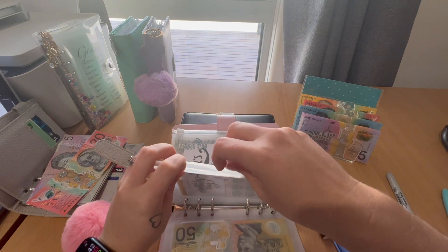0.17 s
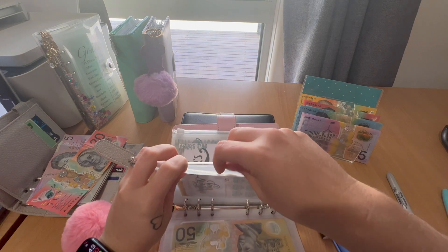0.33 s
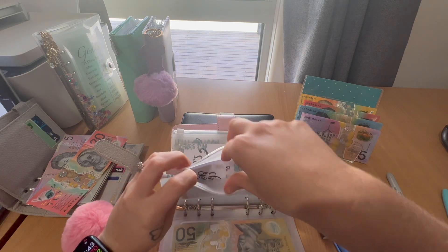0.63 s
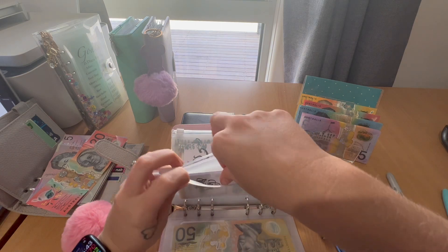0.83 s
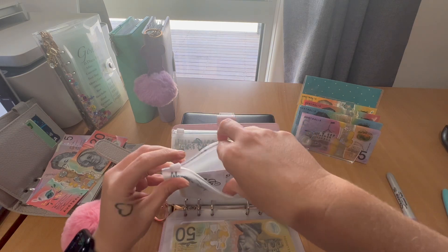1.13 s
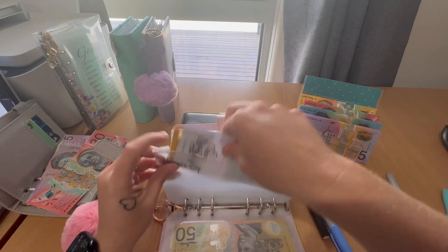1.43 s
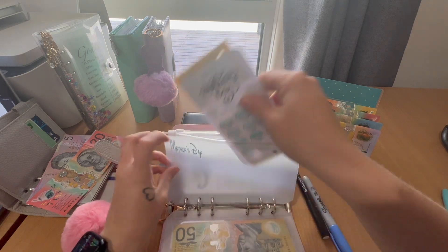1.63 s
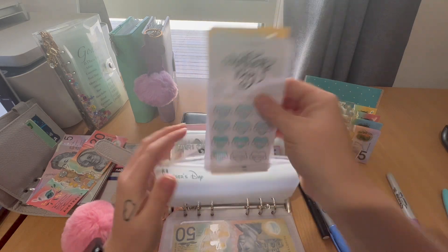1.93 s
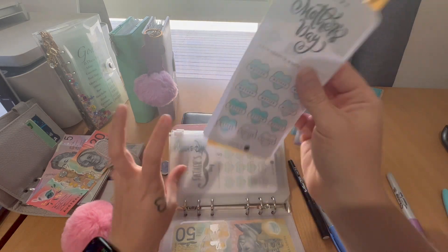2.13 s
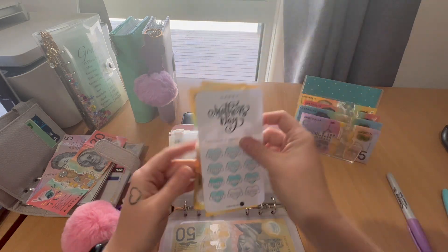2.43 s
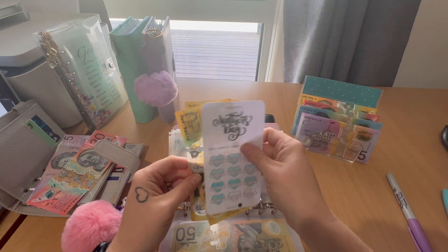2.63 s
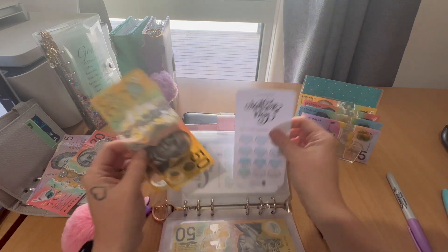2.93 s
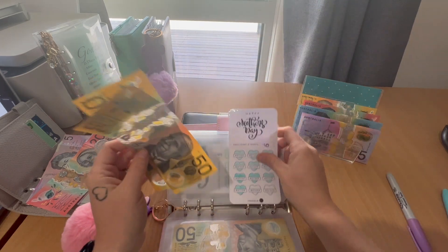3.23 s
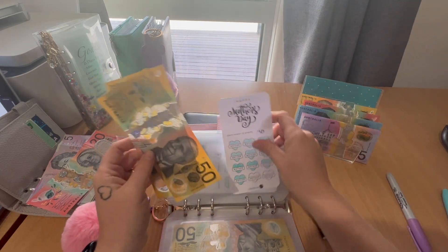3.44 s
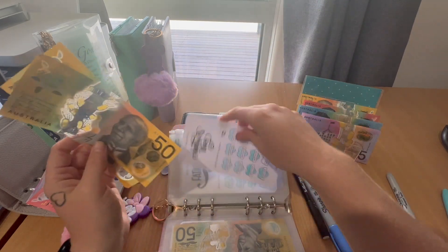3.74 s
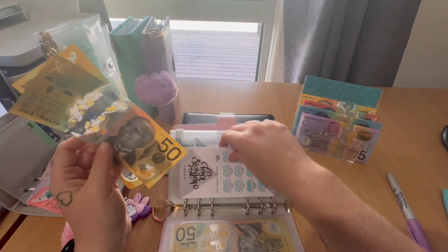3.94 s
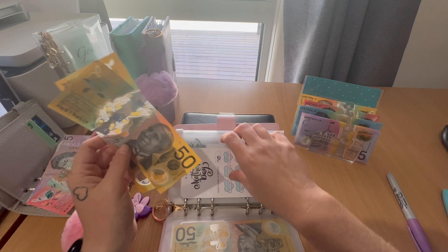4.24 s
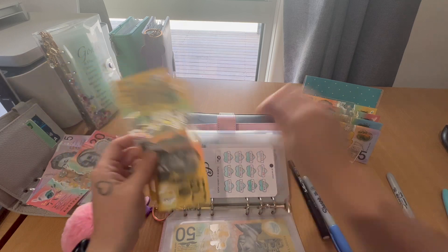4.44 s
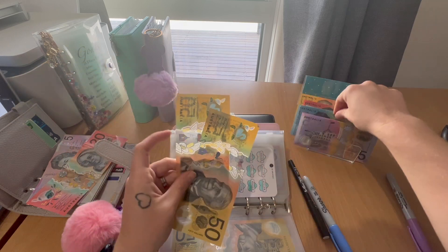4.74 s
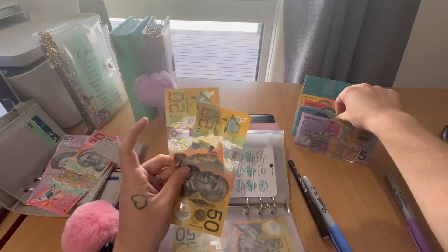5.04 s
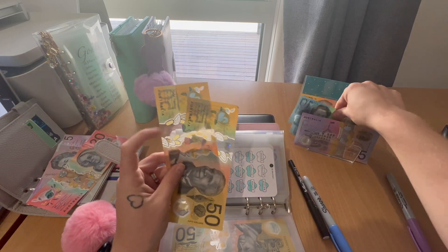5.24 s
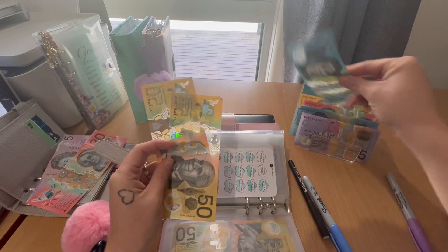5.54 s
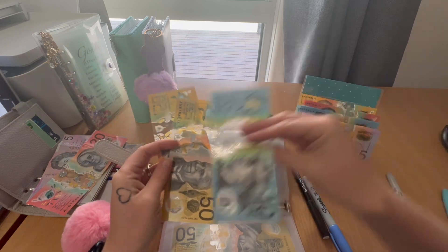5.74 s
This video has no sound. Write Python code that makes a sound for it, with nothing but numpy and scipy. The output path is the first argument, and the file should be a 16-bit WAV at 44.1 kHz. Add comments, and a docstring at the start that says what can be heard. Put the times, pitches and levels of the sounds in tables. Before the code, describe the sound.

A quiet room with soft air noise, a low fan-like hum and a barely audible thin whine, heard by close stereo microphones. Hands work at a plastic pocket: faint rustles and ticks from 0 s, a cluster of clicks and a pop around 0.6 s, then a very loud, dry snap at 1.0 s. A long, hissing slide runs from 1.3 to 1.75 s, with another hard snap, hollow pop and low bump at 1.55 s. Bright film rustles follow around 1.8-2.1 s, then notes part with rubbing at 2.7-3 s, a strong pop at 3.0 s and another at 3.5 s. Around 3.8-3.9 s the card slips in with a short squeak and click. After 4.2 s handling is sparse and light, with small flicks at 5.4 and 5.6 s. Faint high chirps, about every 0.44 s, begin at 2.4 s; the hum swells briefly near 4.5 s.

```python
"""Hands open a clear plastic binder pocket on a desk, draw out a card and polymer banknotes, part them,
slide the card back and fetch another note. Films hiss as dense tiny slips, snap at their edges and pop as
they buckle, each flick ringing damped modes. Faint chirps from further off join in before the middle.
Behind it all lie room air, a low fan-like hum and a thin whine; two close microphone ports hear it."""
import sys
import numpy as np
from scipy import signal
from scipy.fft import rfft, irfft, next_fast_len
from scipy.io import wavfile
from scipy.ndimage import map_coordinates

SR = 44100
rng = np.random.default_rng(int(sys.argv[2]) if len(sys.argv) > 2 else 0)


def master(y):
    """Save y as 16-bit WAV."""
    cut = np.clip(np.atleast_2d(y).T, -1, 1)
    pcm = np.round(cut * 32767)  # scale
    wavfile.write(sys.argv[1], SR, pcm.astype(np.int16))


N = 258867
TIME = np.arange(N) / SR

# Long pull of card and notes out of the pocket, before the grip gain.
# Each row: time in seconds, friction hiss in dB, rasp in dB, edge sizzle in dB.
PULL = [(1.27, -58, -52.5, -85), (1.315, -37, -52.5, -41), (1.35, -43, -44.5, -47),
        (1.42, -43.5, -44.5, -42.5), (1.53, -36, -49.5, -42.5), (1.59, -48, -47.5, -56),
        (1.66, -51, -51.5, -59), (1.72, -48.5, -48, -69), (1.79, -62, -66, -78)]
# Short strokes of film on film, before the grip gain. Each row: start in seconds, attack in seconds,
# hold in seconds, friction hiss in dB, rasp against the hiss in dB, edge sizzle against the hiss in dB.
STROKES = [(0.016, 0.022, 0.02, -62.5, 11, -9), (0.155, 0.015, 0.0063, -57.5, 9, -9),
           (0.238, 0.0091, 0.052, -59.5, 4, -21), (0.414, 0.012, 0.009, -75, 0, -12),
           (0.51, 0.025, 0.043, -52.5, 4.5, -16), (0.617, 0.12, 0.01, -50.5, 7, -15),
           (0.924, 0.012, 0.12, -48.5, 0, -16), (1.096, 0.091, 0.046, -50, 4, -10),
           (1.777, 0.077, 0.023, -41, -6.5, -3.5), (1.91, 0.02, 0.02, -45.5, -5, -4.5),
           (1.997, 0.019, 0.063, -54, -7, -19), (2.125, 0.0067, 0.0084, -48.5, 8, 1),
           (2.395, 0.12, 0.038, -55, -6, -12), (2.646, 0.024, 0.011, -59.5, 6, 3),
           (2.721, 0.084, 0.028, -41.5, -1.5, -3), (2.929, 0.012, 0.051, -43.5, -25, -4.5),
           (3.254, 0.02, 0.046, -51, -1, -31), (3.35, 0.095, 0.093, -57, 5, -27),
           (3.62, 0.047, 0.022, -52.5, 4, -8), (3.789, 0.0072, 0.08, -55.5, -4, 9.5),
           (3.847, 0.018, 0.018, -44.5, 1, -8), (3.88, 0.008, 0.03, -51.5, 9, -16),
           (4.064, 0.011, 0.0069, -56, -5, -10), (4.138, 0.025, 0.017, -50.5, -13, -12),
           (4.395, 0.042, 0.041, -55, -13.5, -12), (4.616, .012, 0.063, -61, -10, -8.5),
           (4.991, 0.014, 0.016, -60.5, 5, -8), (5.056, 0.015, 0.08, -58.5, -7, -11),
           (5.19, 0.025, 0.015, -60, 4, -9), (5.304, 0.032, 0.12, -62.5, 0, 2),
           (5.44, 0.11, 0.14, -59.5, -18, -13), (5.598, 0.032, 0.069, -57, -10, -0.5),
           (5.835, 0.0091, 0.014, -58.5, -11, 3.5)]
STROKE_RELEASE_DB_PER_S, SIZZLE_RELEASE_DB_PER_S = 282, 400   # the fine sizzle stops first
# The held sheets are never quite still, least of all once the notes are out; before the grip gain.
# Each row: time in seconds, friction hiss in dB, rasp in dB, edge sizzle in dB.
RESTING = [(0, -94, -58, -99), (2.3, -94, -63, -84), (4.9, -81, -63.5, -79), (5.87, -65, -61, -72)]
# Colours of the rubbing, as relative spectra. Each row: frequency in Hz, density in dB per Hz.
RASP = [(400, -8), (900, 0.5), (1250, 12), (1650, 16), (2200, 7.5), (3300, -33)]
HISS = [(1800, -9), (2700, 0.5), (3800, -2.5), (4600, -2.5), (5600, -2.5), (7000, -7), (8500, -8),
        (11000, -50)]
SIZZLE = [(6500, 5.5), (9000, -1), (12000, 4), (16000, -3)]
# The card edge singing against the pocket, before the grip gain. Each row: time in seconds, level in dB.
SQUEAK = [(3.78, -71), (3.81, -44), (3.85, -44), (3.872, -60), (3.9, -88)]
SQUEAK_HZ, SQUEAK_WIDTH_HZ = 5520, 580
# A card edge scraping. Each row: start in seconds, hold in seconds, level in dB, resonance in Hz.
SCRAPES = [(0.027, 0.036, -53.5, 2940), (0.728, 0.018, -39, 2800), (1.4, 0.065, -40, 2500),
           (1.918, 0.018, -40.5, 3020), (2.002, 0.0079, -43, 2700), (3.648, 0.036, -45, 2900),
           (5.64, 0.012, -52, 3070)]
SCRAPE_ATTACK_S, SCRAPE_RELEASE_DB_PER_S, SCRAPE_WIDTH_HZ = 0.0057, 400, 840

# Edges snapping free. Each row: time in seconds, level in dB, own ring in Hz, its t60 in seconds,
# brightness in dB per octave, crackle against the main release in dB.
SNAPS = [(0.0413, -60, 5070, .006, 19, 5), (0.2783, -32.5, 4770, 0.0081, -3.5, 3.5),
         (0.3055, -41, 6000, .004, 4, -1), (0.5625, -38, 4900, .005, -9, 2),
         (0.5985, -39, 4000, .005, -11, -8), (0.6258, -29, 5600, 0.0028, -1.5, 8),
         (0.9832, -24, 6000, 0.0044, -5.5, 9), (0.9853, -4, 2810, 0.0072, -3.5, -31),
         (0.9859, -9, 3700, 0.003, -1.5, -17), (0.9868, -20.5, 5600, 0.0078, 1, -5),
         (0.9915, -37, 3300, .004, -1, 1), (0.9937, -20, 6500, 0.008, -0.5, -8),
         (1.2045, -33.5, 4150, .005, -6, 3), (1.2674, -38.5, 3900, .005, 5, 6),
         (1.274, -26, 3830, .012, -3.5, 1.5), (1.5412, -25, 5360, 0.0045, -3, 19.5),
         (1.5465, -9, 3170, 0.0076, 0.5, -9), (1.5494, -6, 2255, 0.0073, -2.5, 2.5),
         (1.5508, -2.5, 5400, 0.0052, 1, -23), (1.6805, -33, 3000, .005, -6, -2),
         (1.7065, -32.5, 3200, 0.0054, -3, -8), (1.722, -41, 6300, 0.0074, 6, 7),
         (1.8267, -27.5, 8100, 0.0083, 16, 5.5), (2.1309, -21.5, 3300, 0.0074, 1, -3),
         (2.1445, -33, 4420, .006, 9, -4), (2.9365, -37, 7000, .004, 13, 7),
         (3.1038, -32, 2540, .006, -8.5, 9.5), (3.1343, -30.5, 3140, 0.008, -5.5, -12),
         (3.2735, -36.5, 6750, 0.024, -5.5, 3), (3.3175, -40.5, 6160, 0.0046, -4.5, 4),
         (3.4255, -57, 7000, .004, 2.5, -2), (3.4974, -39, 5900, 0.0055, -2, 4),
         (3.533, -33.5, 3840, 0.0035, -3.5, 3.5), (3.7938, -30, 5600, 0.011, -1.5, -11),
         (3.8786, -23.5, 3260, 0.014, -6, -12), (4.0725, -41.5, 4760, .005, -5, 5.5),
         (4.1808, -47, 5200, .005, 3, -3), (4.7521, -45.5, 4500, 0.0045, -4, 12.5),
         (4.8229, -41.5, 4000, .008, -4.5, 8), (4.946, -45, 5600, .004, -3, 3),
         (5.419, -27.5, 6350, 0.0022, 3, -1), (5.6177, -28, 4630, 0.0044, 2.5, -5),
         (5.6625, -37, 3980, .005, 0, 5)]
# Sheets buckling with a dull pop. Each row: time in seconds, level in dB, own ring in Hz,
# its t60 in seconds, brightness in dB per octave, crackle against the main release in dB.
POPS = [(0.6262, -23.5, 1470, 0.012, 7, 3), (0.6294, -20.5, 1790, 0.011, 9, -19),
        (0.9355, -31.5, 1400, 0.012, 4, 9), (0.9475, -33.5, 1620, .009, 0.5, -2),
        (1.5497, -17.5, 1760, 0.0035, 7, -5), (1.6803, -35, 1550, 0.009, 2, -10),
        (1.706, -26.5, 1630, 0.0073, 6.5, -18), (2.0405, -35, 940, 0.02, 0, -15),
        (2.0647, -37, 1790, 0.013, 10, 16), (2.0872, -32, 1700, 0.0042, 4.5, -11),
        (2.5207, -33, 1420, 0.019, -2, 8), (3.001, -25.5, 2330, 0.0045, -5, 3),
        (3.009, -12, 1640, .0045, -1, -7), (3.1045, -36.5, 1670, 0.0088, 3, 1),
        (3.1341, -22, 1530, 0.003, 1, 3.5), (3.2745, -34, 1700, 0.0041, 6, 5),
        (3.3172, -31, 1180, 0.0059, -4, 5), (3.5329, -16, 1550, 0.0089, 1.5, -3),
        (3.5355, -26, 1560, 0.0061, 3, -5), (3.8776, -23, 1680, 0.011, 7, -17),
        (3.9025, -36, 1730, .008, 7, -1), (3.9115, -36, 1750, 0.0056, -6, 1),
        (4.0706, -37.5, 1920, 0.021, 6, 2), (4.1639, -36.5, 1810, 0.017, 7, 11),
        (5.6175, -28.5, 1400, 0.0055, -4, 10.5), (5.6618, -27.5, 2480, 0.005, -2.5, -3),
        (5.6705, -44, 2300, 0.0073, -5, -3)]
# Modes of a snapping film, before brightness and bend. Each row: frequency in Hz, level in dB, t60 in seconds.
FILM = [(384, -33, 0.078), (954, -8, 0.01), (1590, -10.5, 0.0053), (2310, 2.5, 0.0034), (3540, 12, 0.00089),
        (4990, 9.5, 0.0012), (6500, -1.5, 0.0033), (8370, -4, 0.004), (12500, -9, 0.0048),
        (15000, -11.5, 0.0014)]
# Modes of a buckling sheet, before brightness. Each row: frequency in Hz, level in dB, t60 in seconds.
SHEET = [(440, -9, 0.007), (740, -24.5, 0.014), (1140, -8.5, 0.011), (1400, -3.5, 0.0077),
         (2190, 1.5, 0.0011), (2760, -3.5, 0.003)]
# What the contact passes on; a free edge is hard, a buckle is soft. Each row: frequency in Hz, gain in dB.
HARD_CONTACT = [(100, -5), (5000, 3), (10000, 0.5), (16000, -3.5)]
SOFT_CONTACT = [(100, -22.5), (250, -3), (480, 4.5), (1600, 4.5), (2400, 5), (3600, -0.5), (7000, 9.5),
                (11000, -15), (16000, -0.5)]
# own ring at a flick level of 0 dB (dB), and its further change with flick level (dB per dB)
SNAP_RING_DB, POP_RING_DB, RING_GROWTH = 4, 11, 0.24
# a film is bent differently at every flick, which detunes its short waves
BEND_OCTAVES, BEND_FROM_HZ = .12, 6000
CRACKLE_T60_S = 0.08

# The pocket bumps against the binder.
# Each row: time in seconds, frequency in Hz, level in dB, t60 in seconds.
THUDS = [(0.629, 640, -24, .03), (0.9873, 930, -11, 0.019), (1.547, 71, -39, 0.15),
         (1.549, 217, -39.5, 0.095), (1.553, 514, -27, 0.051), (1.607, 404, -29.5, 0.069)]
# Where the hands work. Each row: time in seconds, lag of the right port in milliseconds.
PLACE = [(.63, 0.2), (.98, 0.06), (1.3, .19), (2.8, 0.15), (3.0, 0.098), (3.55, 0.083), (3.8, 0.15),
         (4.8, 0.024), (5.6, 0.022)]

# Faint high chirps from further off. Each row: start in seconds, level in dB, starting pitch in Hz.
CHIRPS = [(2.43, -57, 4700), (2.866, -58, 4700), (3.306, -60, 4700), (3.744, -59, 4700),
          (4.186, -57.5, 4700), (4.623, -60, 4750), (5.056, -56, 5400), (5.505, -61, 5000)]
CHIRP_HZ, CHIRP_GLIDE_S, CHIRP_BLUR_HZ = 4570, 0.012, 130   # pitch reached, glide time constant, pitch waver
CHIRP_ATTACK_S, CHIRP_HOLD_S, CHIRP_RELEASE_DB_PER_S = 0.02, 0.016, 418
CHIRP_FLUTTER_DB, CHIRP_FLUTTER_HZ = 3, 70

# Echoes off the desk and the things on it.
# Each row: left delay in milliseconds, right delay in milliseconds, level in dB.
ECHOES = [(1.82, 2.1, -14.5), (8.4, 1.3, -25)]
ROOM_T60_S, ROOM_TREBLE_T60_S, ROOM_TREBLE_HZ = 0.45, 0.44, 9000   # the walls soak up the top a touch sooner
WALL_EDGE_HZ = 7000   # the tail softens above this
ROOM_DB, CHIRP_ROOM_DB = -13, -4
CLICK_ROOM_DB = -13.5   # a flicked sheet sends its click all round the room

# Room air, as a relative spectrum. Each row: frequency in Hz, density in dB per Hz.
AIR = [(25, -21), (45, -16.5), (105, -17.5), (190, -8.5), (330, -7), (560, -12), (920, -7.5), (1500, -16),
       (2300, -27), (3400, -37.5), (5800, -42), (8500, -44.5), (11000, -65), (16000, -67.5)]
AIR_DB, AIR_WAVER_DB, AIR_WAVER_HZ = -38.5, .5, 5
# Left-right likeness of the room air. Each row: frequency in Hz, likeness from -1 to 1.
LIKENESS = [(60, 0.92), (160, 0.28), (290, 0.065), (640, -0.25), (1400, -0.4), (3100, 0.25), (15000, -0.16)]
# Fan-like hum, before its swell. Each row: frequency in Hz, width in Hz, level in dB.
HUM = [(171.4, 39, -55), (184.5, 12, -53.5), (186, 9, -59.5), (213.2, 5.3, -57.5), (261.6, 13.5, -55)]
# The hum dips and swells once. Each row: time in seconds, gain in dB.
HUM_SWELL = [(4.2, 7.5), (4.32, 1), (4.5, 12), (4.68, 5.5), (4.9, 5)]
WHINE_HZ, WHINE_WIDTH_HZ, WHINE_DB = 6960, 280, -72.5

# Level at the right port against the left. Each row: frequency in Hz, gain in dB.
RIGHT_PORT = [(80, -2.5), (200, -3.5), (550, -2), (950, -4.5), (1500, -5.5), (2100, -3), (3500, -8),
              (6000, -12.5), (7500, -9.5), (9200, 2), (15000, -0.5)]
CUTOFF_HZ = 16250


def from_db(db):
    """Decibels to gain."""
    return 10 ** (np.asarray(db) / 20)


def rms_one(x):
    """Scale to unit rms."""
    return x / np.sqrt(np.mean(x ** 2) + 1e-20)


def in_time(rows):
    """The columns of a curve at every sample."""
    s, *columns = np.transpose(rows)
    return [np.interp(TIME, s, column) for column in columns]


def at_hz(points, hz):
    """Read a spectrum on a log-frequency axis."""
    f, value = np.transpose(points)
    return np.interp(np.log(hz), np.log(f), value)


def filtered(x, response):
    """Apply a gain given as a function of frequency."""
    size = next_fast_len(x.shape[-1] + 2048, True)
    hz = np.maximum(np.arange(size // 2 + 1) * SR / size, 1)
    return irfft(rfft(x, size) * response(hz), size)[..., :x.shape[-1]]


def coloured(x, spectrum):
    """Give a signal a spectrum; rms 1."""
    return rms_one(filtered(x, lambda hz: from_db(at_hz(spectrum, hz))))


def narrow_noise(centre_hz, width_hz):
    """Noise in one resonance; rms 1."""
    noise = rng.standard_normal(N)
    return rms_one(filtered(noise, lambda hz: 1 / (1 + ((hz - centre_hz) / width_hz * 1.3) ** 2)))


def drift(rate_hz):
    """Slow chance with spread 1."""
    return rms_one(filtered(rng.standard_normal(N), lambda hz: 1 / (1 + (hz / rate_hz) ** 2)))


def at_ports(x, lag_ms):
    """Sound from the left reaches the right port a little later."""
    late = map_coordinates(x, [np.arange(len(x)) - lag_ms * SR / 1000], order=3)
    return np.array([x, late])


def stroke(start, attack, hold, release_db_per_s):
    """A movement gathers speed, holds it and dies away."""
    age = TIME - start
    rise = np.sin(np.pi / 2 * np.clip(age / attack, 0, 1)) ** 2
    return rise * from_db(-release_db_per_s * np.clip(age - attack - hold, 0, .5))


def rubbing():
    """The sheets slide under an unsteady grip, which shakes rasp, hiss, sizzle and squeak together."""
    hiss_gain, rasp_gain, sizzle_gain = sliding()
    grip = from_db(1.8 * drift(45) + 3.0)
    rasp = rasp_gain * friction(RASP, slips_per_s=2000, spread_db=3.5, crinkle_db=-6.0)
    hiss = hiss_gain * friction(HISS, slips_per_s=7000, spread_db=3.0, crinkle_db=-5)
    sizzle = sizzle_gain * friction(SIZZLE, slips_per_s=12000, spread_db=2.5, crinkle_db=-7)
    squeak = from_db(in_time(SQUEAK)[0]) * narrow_noise(SQUEAK_HZ, SQUEAK_WIDTH_HZ)
    handling = grip * (rasp + hiss + sizzle + squeak) + scrapes()
    return np.array([flexing(port) for port in at_ports(handling, in_time(PLACE)[0])])


def sliding():
    """Strength of hiss, rasp and sizzle: the resting grip, the long pull and the strokes add in power."""
    pulling = (TIME > PULL[0][0]) & (TIME < PULL[-1][0])
    power = from_db(in_time(RESTING)) ** 2 + pulling * from_db(in_time(PULL)) ** 2
    for start, attack, hold, hiss_db, rasp_db, sizzle_db in STROKES:
        slide = from_db(hiss_db) * stroke(start, attack, hold, STROKE_RELEASE_DB_PER_S)
        fine_slide = from_db(hiss_db + sizzle_db) * stroke(start, attack, hold, SIZZLE_RELEASE_DB_PER_S)
        power[0] += slide ** 2
        power[1] += (from_db(rasp_db) * slide) ** 2
        power[2] += fine_slide ** 2
    return np.sqrt(power)


def friction(spectrum, slips_per_s, spread_db, crinkle_db):
    """Dense tiny slips of uneven size, and now and then a crease that ticks."""
    sizes = from_db(spread_db * np.minimum(rng.exponential(1, N), 4)) * rng.choice([-1, 1], N)
    slips = rms_one(sizes * (rng.random(N) < slips_per_s / SR))
    creases = rms_one(rng.uniform(-1, 1, N) * (rng.random(N) < 130 / SR))   # about 130 a second
    return coloured(slips + from_db(crinkle_db) * creases, spectrum)


def scrapes():
    """A dragged edge catches and slips: a burst of noise in one resonance of the card."""
    out = np.zeros(N)
    for start, hold, db, hz in SCRAPES:
        drag = from_db(db) * stroke(start, SCRAPE_ATTACK_S, hold, SCRAPE_RELEASE_DB_PER_S)
        out += drag * narrow_noise(hz, SCRAPE_WIDTH_HZ)
    return out


def flexing(x):
    """The gap between the bending sheets keeps changing, so its echo sweeps the colour of the rustle."""
    gap_ms = 1.1 * from_db(1.2 * drift(6))
    echo = at_ports(x, gap_ms)[1]
    return x + from_db(-8) * echo


def flicks(events, modes, contact, full_ring_db):
    """Each flick rings the sheet's modes and one of its own, then small creases give way in a dying crackle."""
    out, t = np.zeros((2, N + SR)), np.arange(SR // 12) / SR
    for s, level_db, ring_hz, ring_t60, bright_db, crackle_db in events:
        ring_db = full_ring_db + RING_GROWTH * level_db
        ring = from_db(ring_db - 60 * t / ring_t60) * np.sin(2 * np.pi * ring_hz * t)
        for k, (hz, db, t60) in enumerate(modes):
            hz = hz * 2 ** (BEND_OCTAVES * rng.uniform(-1, 1) * (hz > BEND_FROM_HZ))
            mode_db = db + bright_db * np.log2(hz / ring_hz)
            # neighbouring modes swing in opposite senses
            ring += (-1) ** k * from_db(mode_db - 60 * t / t60) * np.sin(2 * np.pi * hz * t)
        creases = rng.standard_normal(len(t)) * (rng.random(len(t)) < .15)
        force = creases * from_db(-60 * t / CRACKLE_T60_S)
        force = signal.lfilter([1, -.5], [1], force)   # tiny creases are brighter than the main release
        force *= from_db(crackle_db) / np.linalg.norm(force)
        force[0] = 1   # the main release
        click = signal.fftconvolve(force, ring)[:len(t)]
        start, lag_ms = round(s * SR), np.interp(s, *np.transpose(PLACE))
        out[:, start:start + len(t)] += from_db(level_db) * at_ports(click, lag_ms)
    return filtered(out[:, :N], lambda hz: from_db(at_hz(contact, hz)))


def thuds():
    """Soft bumps, each a damped sine."""
    out = np.zeros(N)
    for s, hz, db, t60 in THUDS:
        age = np.clip(TIME - s, 0, 1)
        out += from_db(db - 60 * age / t60) * np.sin(2 * np.pi * hz * age)
    return at_ports(out, lag_ms=.1)


def chirps():
    """Short, thin, fluttering whistles that slide down onto one wavering pitch."""
    out, waver_hz = np.zeros(N), CHIRP_BLUR_HZ * drift(122)
    for s, db, start_hz in CHIRPS:
        glide = np.exp(-np.clip(TIME - s, 0, 1) / CHIRP_GLIDE_S)
        hz = CHIRP_HZ + waver_hz + (start_hz - CHIRP_HZ) * glide
        swell = stroke(s, CHIRP_ATTACK_S, CHIRP_HOLD_S, CHIRP_RELEASE_DB_PER_S)
        out += from_db(db) * swell * np.sin(2 * np.pi * np.cumsum(hz) / SR)
    flutter = from_db(CHIRP_FLUTTER_DB * drift(CHIRP_FLUTTER_HZ))
    return at_ports(out * flutter, lag_ms=0.011)


def desk(x):
    """The desk mirrors each click and the binders on it scatter it within milliseconds."""
    out = x + diffuse(x, delay_s=.0012, t60=.025, level_db=-9, edge_hz=12000, treble_t60=.025)
    for left_ms, right_ms, db in ECHOES:
        delay_s = np.array([[left_ms], [right_ms]]) / 1000
        # a delay is a phase turn; each echo also loses its top
        out += filtered(x, lambda hz: from_db(db) * np.exp(-2j * np.pi * hz * delay_s) / np.hypot(1, hz / 6000))
    return out


def walls(x, level_db):
    """The short soft tail that the walls give back."""
    return diffuse(x, delay_s=0.003, t60=ROOM_T60_S, level_db=level_db, edge_hz=WALL_EDGE_HZ,
                   treble_t60=ROOM_TREBLE_T60_S)


def diffuse(x, delay_s, t60, level_db, edge_hz, treble_t60):
    """Many dying reflections, different at each port; the treble has its own decay."""
    t = np.arange(SR // 2) / SR
    noise = rng.standard_normal((2, len(t)))
    low = filtered(noise, lambda hz: 1 / (1 + (hz / ROOM_TREBLE_HZ) ** 4))
    decay, treble_decay = from_db(-60 * t / t60), from_db(-60 * t / treble_t60)
    arrived = t > delay_s
    tail = (low * decay + (noise - low) * treble_decay) * arrived
    tail *= from_db(level_db) / np.linalg.norm(noise * decay * arrived, axis=1, keepdims=True)
    tail = filtered(tail, lambda hz: 1 / np.hypot(1, hz / edge_hz))
    return signal.fftconvolve(x, tail, axes=1)[:, :N]


def room_tone():
    """Diffuse air noise, most alike at both ports in the bass, a hum that swells and a faint high whine."""
    mid, side = rng.standard_normal((2, N))
    mid = filtered(mid, lambda hz: np.sqrt(1 + np.clip(at_hz(LIKENESS, hz), -1, 1)))
    side = filtered(side, lambda hz: np.sqrt(1 - np.clip(at_hz(LIKENESS, hz), -1, 1)))
    air_gain = from_db(AIR_DB + AIR_WAVER_DB * drift(AIR_WAVER_HZ))
    air = air_gain * coloured(np.array([mid + side, mid - side]), AIR)
    hum = sum(from_db(db) * narrow_noise(hz, width) for hz, width, db in HUM)
    hum *= from_db(in_time(HUM_SWELL)[0])
    whine = from_db(WHINE_DB) * narrow_noise(WHINE_HZ, WHINE_WIDTH_HZ)
    return air + hum + whine


def scene():
    """The handling in the room, over the room's own sound."""
    snaps = flicks(SNAPS, FILM, HARD_CONTACT, SNAP_RING_DB)
    pops = flicks(POPS, SHEET, SOFT_CONTACT, POP_RING_DB)
    clicks = snaps + pops
    near, far = thuds() + rubbing(), chirps()
    tails = walls(clicks, CLICK_ROOM_DB) + walls(near, ROOM_DB) + walls(far, CHIRP_ROOM_DB)
    return desk(clicks) + near + far + tails + room_tone()


def record(dry):
    """The right port gets its own colour, rumble is cut, peaks beyond 0.8 clip, the top is cut."""
    right = filtered(dry[1], lambda hz: from_db(at_hz(RIGHT_PORT, hz)))
    rumble_cut = signal.butter(9, 37, "high", fs=SR, output="sos")
    top_cut = signal.ellip(16, .1, 100, CUTOFF_HZ, fs=SR, output="sos")
    ports = signal.sosfilt(rumble_cut, [dry[0], right])
    return signal.sosfilt(top_cut, np.clip(ports, -.8, .8))


dry = scene()
out = record(dry)
master(out)
```